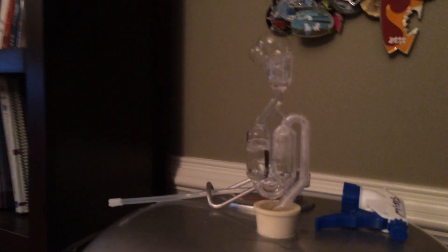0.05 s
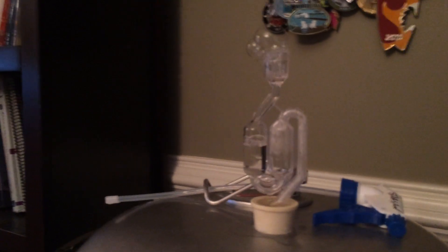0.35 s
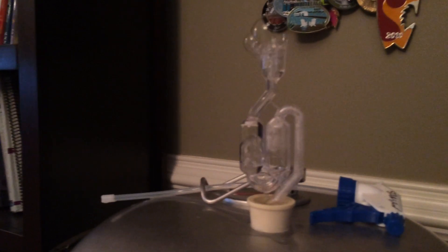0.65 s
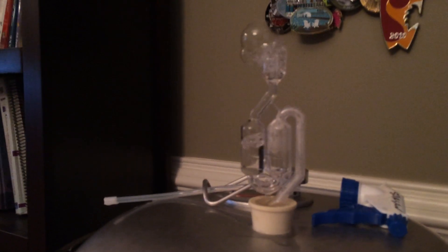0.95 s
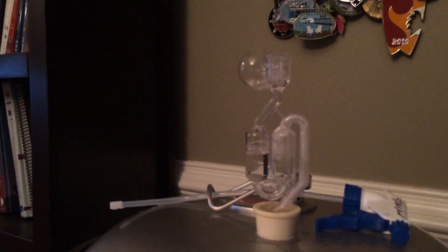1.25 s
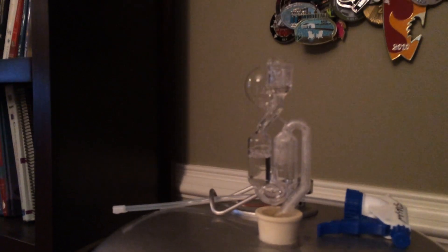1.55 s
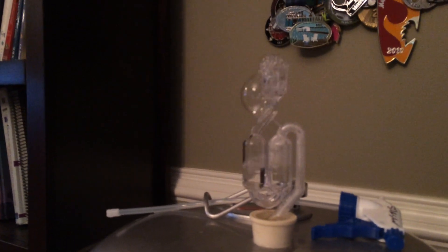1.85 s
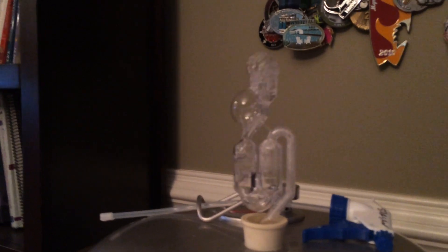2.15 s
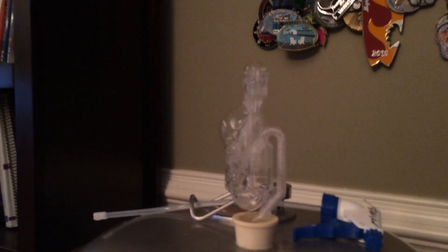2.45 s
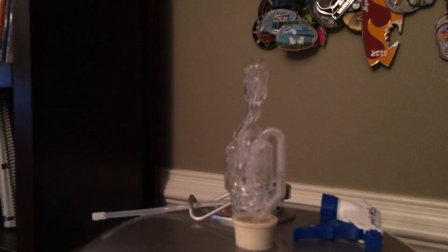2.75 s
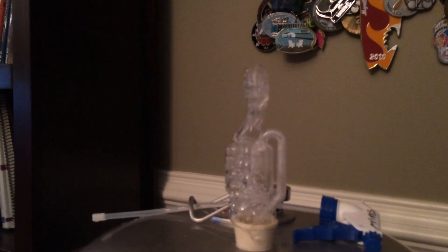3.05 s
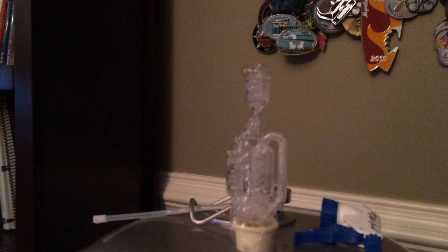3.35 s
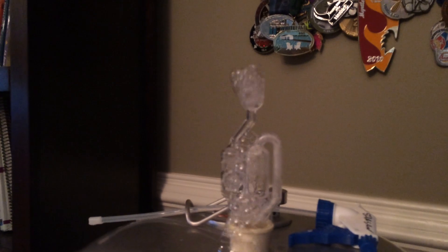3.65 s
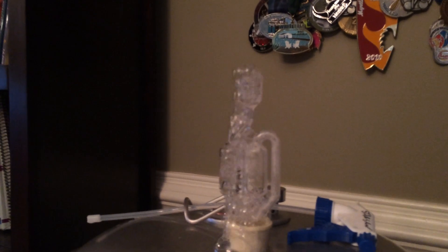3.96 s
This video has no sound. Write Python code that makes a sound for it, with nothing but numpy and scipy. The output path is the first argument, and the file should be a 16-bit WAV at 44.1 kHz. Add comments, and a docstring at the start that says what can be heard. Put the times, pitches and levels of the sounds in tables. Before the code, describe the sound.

Gas bubbles through the liquid in a plastic airlock, first as two separate plops, then as quick, churning gurgles. A few close, dry clicks come before the plops, and a soft hiss fills the small room throughout.

```python
"""An airlock bubbles in a small quiet room: gas pushes through the liquid in two single plops, then a
run of gurgles. Each bubble rings with a gliding pitch, mostly upward; bursting films ring the chamber
and throw a fine spray, while the liquid churns and gas squirts through closing pockets.
Near the start a few dry handling clicks sound close by. A steady hiss lies under it all."""
import sys
import numpy as np
from scipy import signal
from scipy.fft import rfft, irfft
from scipy.io import wavfile
from scipy.ndimage import map_coordinates

SR = 44100
rng = np.random.default_rng(int(sys.argv[2]) if len(sys.argv) > 2 else 0)


def wrap_up_sound(samples):
    """Save the sound to the file named by the first command line argument, as 16-bit audio."""
    columns = np.atleast_2d(samples).T
    # keep every value between -1 and 1, then stretch to whole-number steps
    tamed = np.clip(columns, -1, 1)
    steps = np.round(tamed * 32767).astype(np.int16)
    wavfile.write(sys.argv[1], SR, steps)


N = 176400


def gurgles():
    """Gas passes through the liquid bubble by bubble; the small, high ones hold their pitch better."""
    # Each row: start in seconds, pitch in Hz, level in dB, decay time in seconds,
    # opening glide in octaves per second.
    bubbles = [(0.0, 597, -41, 0.013, 2.5), (0.147, 1110, -59, 0.017, -2.5),
               (.722, 523.4, -24.5, 0.011, -0.5), (.723, 700, -36.5, 0.0064, 6),
               (.725, 1126, -29, 0.0051, 8.5), (.759, 12200, -46, 0.00063, 3), (0.772, 430, -28, 0.0012, 8),
               (.830, 784, -50, 0.013, 11), (.866, 606, -36.5, 0.0021, 0), (1.135, 905, -52, 0.016, 0.5),
               (1.823, 471, -25.5, 0.0081, -9), (1.824, 867, -26, 0.0031, 0),
               (1.824, 1120, -31.5, 0.0024, 10), (1.933, 864, -41, 0.009, 4.5),
               (1.984, 523, -35.5, 0.015, 2.5), (2.005, 1425, -50, 0.0094, -5.5),
               (2.068, 515, -37, 0.018, 3), (2.159, 540, -26.5, 0.0016, 16), (2.186, 782, -34.5, 0.013, 13),
               (2.205, 336, -45, 0.0024, 3), (2.207, 1460, -36, 0.0061, 3.5),
               (2.236, 847, -37.5, 0.011, -10), (2.302, 501, -31, 0.011, 6.5), (2.344, 435, -40, 0.007, -7),
               (2.347, 823, -37, 0.0079, 6), (2.382, 837, -31.5, 0.0075, 2), (2.384, 639, -38, 0.0096, 1.5),
               (2.382, 1840, -40, 0.0054, 2), (2.426, 513, -36, 0.0058, 8), (2.456, 471, -36.5, 0.014, 6.5),
               (2.488, 903, -30, 0.0056, 2), (2.504, 797, -38, 0.016, -0.5), (2.524, 688, -29.5, 0.0058, 1),
               (2.525, 1360, -39.5, 0.013, 7), (2.549, 488, -36, 0.013, 5.5), (2.59, 382, -53, 0.0073, 11),
               (2.652, 510, -42, 0.01, -1.5), (2.679, 567, -39.5, 0.0052, -5),
               (2.749, 826, -43, 0.013, -2.5), (2.774, 392, -41.5, 0.0092, 1.5),
               (2.823, 529, -33.5, 0.0086, 0), (2.857, 510, -29.5, 0.012, 4.5),
               (2.882, 844, -35, 0.012, 4.5), (2.883, 2697, -32.5, 0.0031, -5),
               (2.886, 3080, -37, 0.0028, 12), (2.910, 523, -34, 0.011, 4.5), (2.943, 856, -38.5, 0.016, 6),
               (2.943, 1090, -38, 0.0066, 8), (2.944, 1560, -46, 0.0067, 16), (2.959, 470, -36, 0.0046, 16),
               (2.992, 810, -41.5, 0.018, 1.5), (3.016, 512, -41.5, 0.0068, 13),
               (3.055, 523, -38, 0.024, 2), (3.111, 730, -34.5, 0.0044, 14.5), (3.154, 795, -43, 0.0064, 6),
               (3.217, 508, -35.5, 0.015, 1.5), (3.305, 442, -38, 0.012, -2.5),
               (3.305, 1045, -46, 0.019, 7.5), (3.406, 387, -39, 0.013, 0.5), (3.447, 916, -48.5, 0.012, 3),
               (3.502, 500, -36.5, 0.015, 12), (3.581, 516, -36, 0.005, 5.5),
               (3.607, 864, -40.5, 0.0072, 6), (3.662, 776, -42.5, 0.014, 19), (3.757, 546, -42, 0.015, 6),
               (3.762, 839, -49, 0.018, 9.5), (3.859, 464, -28.5, 0.011, 18),
               (3.899, 2795, -37.5, 0.0042, 1.5), (3.963, 541, -48.5, 0.013, 13)]
    swell_cycles, small_above_hz = 0.24, 585
    out = np.zeros(N)
    for start, hz, db, ring_s, glide in bubbles:
        wobble = 0.045 * min(small_above_hz / hz, 1)
        add(out, start, amp(db) * bubble(hz, ring_s, glide, swell_cycles / hz, wobble, flutter=0.18))
    return radiate(out)


def bubble(hz, ring_s, glide, swell_s, wobble=0, flutter=0):
    """A pocket of gas rings and dies away; its trembling shape wobbles the pitch and flutters the level."""
    glide_s, scoop_octaves, scoop_s, overtone_db = 0.0462, 0.043, 0.0031, -20.5
    t = np.arange(0, 8 * ring_s, 1 / SR)
    octaves = glide * glide_s * np.tanh(t / glide_s)  # the glide stops at the surface
    octaves -= scoop_octaves * np.exp(-t / scoop_s)  # starts flat while the neck pinches off
    pitch = hz * 2 ** octaves * (1 + wobble * drift(len(t), hz=68))
    phase = 2 * np.pi * np.cumsum(pitch) / SR
    level = (1 - np.exp(-t / swell_s)) * np.exp(-t / ring_s)
    level *= 1 + flutter * np.tanh(t / ring_s) * drift(len(t), hz=107)
    return level * (np.sin(phase) + amp(overtone_db) * level * np.sin(2 * phase))


def radiate(x, cutoff_hz=232):
    """A small vessel gives off little bass."""
    return signal.sosfilt(signal.butter(2, cutoff_hz, "high", fs=SR, output="sos"), x)


def bursts():
    """A tearing film is a short crackle that rings the chamber and throws spray."""
    # Each row: start in seconds, chamber ring in dB, spray in dB, crackle decay time in seconds.
    films = [(0.726, -32, -55.5, 0.0051), (0.769, -43, -73, 0.0017), (0.809, -63, -55, 0.0026),
             (1.825, -29.5, -48, 0.0016), (1.828, -58, -57.5, 0.0094), (2.161, -51, -82, 0.0027),
             (2.185, -41, -52.5, 0.0063), (2.213, -60, -70, 0.027), (2.235, -46, -61, 0.0085),
             (2.323, -37.5, -59, 0.0091), (2.326, -58, -56, 0.0016), (2.346, -51.5, -54.5, 0.01),
             (2.358, -52, -53, 0.0017), (2.392, -71, -56, 0.0024), (2.459, -53, -65, 0.007),
             (2.488, -38.5, -61.5, 0.0033), (2.524, -66, -51, 0.0032), (2.584, -38, -51, 0.0016),
             (2.61, -60, -55.5, 0.0058), (2.649, -59.5, -69, 0.032), (2.744, -36, -55.5, 0.0068),
             (2.757, -37, -71, 0.0016), (2.849, -45.5, -63.5, 0.013), (2.887, -41.5, -58, 0.0056),
             (2.987, -59, -63.5, 0.017), (3.099, -46, -61, 0.0087), (3.112, -36.5, -56, 0.0018),
             (3.222, -44.5, -60, 0.002), (3.377, -41.5, -63.5, 0.0054), (3.443, -60, -61, 0.0053),
             (3.529, -52.5, -71, 0.0066), (3.553, -82, -47, 0.0012), (3.607, -33.5, -57.5, 0.0041),
             (3.824, -50, -69, 0.0051), (3.877, -48, -66, 0.0096), (3.889, -47.5, -55.5, 0.0052)]
    # The chamber's resonances. Each row: pitch in Hz, relative level in dB, seconds to fall 60 dB.
    modes = [(832, 5, 0.029), (1195, -2.5, 0.018), (1510, -7.5, 0.013), (2056, 1, 0.012), (2348, 0, 0.033),
             (2647, -2.5, 0.014), (2845, -4.5, 0.017), (3198, -1, 0.0058)]
    cracks_per_s, tear_s = 3500, 0.0003
    t = np.arange(SR // 8) / SR
    strikes, spray = np.zeros((2, N))
    for start, ring_db, spray_db, decay_s in films:
        cracks = rng.random(len(t)) < cracks_per_s / SR
        fade = (1 - np.exp(-t / tear_s)) * np.exp(-t / decay_s)
        crackle = cracks * rng.choice([-1, 1], len(t)) * fade
        crackle *= np.linalg.norm(fade) / (np.linalg.norm(crackle) + 1e-20)
        add(strikes, start, amp(ring_db) * crackle)
        add(spray, start, amp(spray_db) * signal.fftconvolve(crackle, droplets(t[:SR // 50])))
    chamber = sum(amp(db - 60 * t / t60) * np.sin(2 * np.pi * hz * t) * (-1) ** k
                  for k, (hz, db, t60) in enumerate(modes))
    return signal.oaconvolve(strikes, chamber / np.linalg.norm(chamber))[:N] + spray


def droplets(t, count=40):
    """Spray is a scatter of tiny high pings, each with its own pitch, strength and delay."""
    # The tone of the spray. Each row: frequency in Hz, relative level in dB.
    tone = [(3000, 2.5), (4200, 1.5), (6000, -1), (8000, -1), (10500, -4.5), (12000, 0.5), (15500, -16)]
    ring_cycles, spread_db, mean_delay_s = 4.9, 3.5, 0.0027
    low_hz, high_hz = tone[0][0], tone[-1][0]
    hz = low_hz + (high_hz - low_hz) * (np.arange(count) + rng.random(count)) / count
    strength = amp(read(tone, hz) + spread_db * rng.standard_normal(count))
    age = np.maximum(t[:, None] - mean_delay_s * rng.exponential(1, count), 0)
    pings = (np.sin(2 * np.pi * hz * age) * np.exp(-age * hz / ring_cycles)) @ strength
    return pings / np.linalg.norm(pings)


def churn(sizes=48):
    """Bubbles of many sizes ring at random while the liquid is stirred up."""
    # The surges of the liquid. Each row: time in seconds, level in dB.
    surges = [(2.148, -65), (2.194, -43.5), (2.25, -64), (2.28, -73), (2.338, -49), (2.41, -61.5),
              (2.53, -51), (2.63, -60), (2.73, -61), (2.87, -52.5), (2.97, -53.5), (3.28, -67.5),
              (3.63, -56.5), (3.80, -66.5)]
    # The balance of bubble sizes. Each row: pitch in Hz, relative level in dB.
    tone = [(160, -8), (300, -6.5), (500, -6), (850, -4), (1300, -10), (3500, -12), (6000, -24)]
    bubbles_per_s, ring_cycles, spread_db = 800, 4.6, 4
    out = np.zeros(N)
    for hz in np.geomspace(tone[0][0], tone[-1][0], sizes):
        births = (rng.random(N) < bubbles_per_s / sizes / SR) * rng.choice([-1, 1], N)
        strength = amp(spread_db * np.minimum(rng.exponential(1, N), 3))
        ring = bubble(hz, ring_s=min(ring_cycles / hz, 0.012), glide=4.9, swell_s=0.5 / hz)
        out += amp(read(tone, hz)) * signal.oaconvolve(births * strength, ring)[:N]
    level_db = np.interp(np.arange(N) / SR, *np.transpose(surges), left=-120)
    return unit(radiate(out)) * amp(level_db)


def squirts(width_hz=350):
    """Rushing gas rings a shrinking pocket, so a rough whistle slides upward."""
    # Each row: start in seconds, length in seconds, first pitch in Hz, last pitch in Hz, level in dB.
    whistles = [(2.196, 0.058, 1190, 2850, -53.5), (2.335, 0.11, 1348, 2190, -63.5),
                (2.846, 0.0174, 1746, 2240, -54.5)]
    pole = np.exp(-np.pi * width_hz / SR)
    out = np.zeros(N)
    for start, length_s, first_hz, last_hz, db in whistles:
        count = round(length_s * SR)
        noise = rng.standard_normal((SR // 4, 2)) @ [1, 1j]
        rush = signal.lfilter([1], np.poly([pole, pole]), noise)[:count]
        sweep = np.exp(2j * np.pi * np.cumsum(np.linspace(first_hz, last_hz, count)) / SR)
        add(out, start, amp(db) * unit((rush * sweep).real * signal.windows.tukey(count)))
    return out


def handling():
    """Dry ticks, soft bumps and one short rub of a finger, all very close."""
    # Each row: start in seconds, tick level in dB, bump level in dB.
    clicks = [(0.2226, -28, -57), (0.229, -44, -44.5), (0.2584, -43.5, -67), (0.3756, -30, -79),
              (0.4228, -39.5, -51.5)]
    # The tones of the bright tick and the duller rub. Each row: frequency in Hz, relative level in dB.
    tick_tone = [(500, -85), (2200, -12.5), (4200, 3.5), (6500, 3), (10000, -7), (15500, -24)]
    rub_tone = [(300, 2), (1000, 4), (2500, 4), (4000, -5), (8000, -9), (13000, -21)]
    bump_s, rub_start, rub_s, rub_db = 0.00037, 0.312, 0.034, -63.5
    ticks, bumps, rub_level = np.zeros((3, N))
    age = np.arange(SR // 50) / SR / bump_s
    bump = age * (2 - age) * np.exp(1 - age)  # one push and a softer rebound
    for start, tick_db, bump_db in clicks:
        add(ticks, start, amp([tick_db]))
        add(bumps, start, amp(bump_db) * bump)
    add(rub_level, rub_start, amp(rub_db) * signal.windows.tukey(round(rub_s * SR)))
    return colour(ticks, tick_tone) + bumps + colour(rub_level * rng.standard_normal(N), rub_tone)


def room(x):
    """The small room adds a short diffuse tail, low resonances and near reflections."""
    # The diffuse tail. Each row: frequency in Hz, level in dB, seconds to fall 60 dB.
    tail = [(121, 11.5, 0.051), (215, 1, 0.087), (466, -20, 0.88), (960, -7.5, 0.47), (2870, -12, 0.48),
            (6470, -6, 0.76), (13900, -7, 0.24)]
    # The boom of the vessel and its corner. Each row: pitch in Hz, gain in dB, seconds to fall 60 dB.
    booms = [(203.3, -3, 0.16), (364.9, 9.5, 0.15), (542.3, -7, 0.25)]
    # Reflections off the table and the wall. Each row: delay in seconds, gain.
    echoes = [(.0055, 0.21), (0.0107, 0.22)]
    t = np.arange(SR // 2) / SR
    hz, age, bands = signal.stft(rng.standard_normal(len(t)), SR, nperseg=256)
    tail_db = read(np.array(tail)[:, :2], hz)[:, None]
    tail_t60 = read(np.array(tail)[:, ::2], hz)[:, None]
    bands *= amp(tail_db - 60 * age / tail_t60) * np.sqrt(2 * np.log(1000) / (tail_t60 * SR))
    fade_in = np.minimum(t / 0.0033, 1)
    response = signal.istft(bands, SR, nperseg=256)[1][:len(t)] * fade_in
    for boom_hz, db, t60 in booms:
        ring = amp(db - 60 * t / t60) * np.cos(2 * np.pi * boom_hz * t)
        response += ring * 2 * np.log(1000) / (t60 * SR)  # same gain however long it rings
    for delay, gain in echoes:
        add(response, delay, np.array([gain]))
    return x + signal.oaconvolve(x, response)[:N]


def background(hiss_db=-67.5):
    """Steady hiss and room rumble with a faint hum."""
    # The tone of the rumble and hiss. Each row: frequency in Hz, relative level in dB.
    tone = [(20, -41), (42, -9), (119, -5.5), (259, -12.5), (289, -18), (372, -12), (404, -13),
            (746, -24.5), (932, -22.5), (1070, -27.5), (1200, -25), (2270, -29.5), (3170, -31),
            (15500, -38)]
    # Each row: pitch in Hz, level in dB.
    hum_tones = [(119, -75.5), (920, -80)]
    t = np.arange(N) / SR
    gain = amp(read(tone, np.fft.rfftfreq(N, 1 / SR)))
    hiss = irfft(rfft(rng.standard_normal(N)) * gain, N)
    hum = sum(amp(db) * np.sin(2 * np.pi * (hz * t + rng.random())) for hz, db in hum_tones)
    return amp(hiss_db) * unit(hiss) + hum


def amp(db):
    """Decibels to gain."""
    return 10 ** (np.asarray(db) / 20)


def unit(x):
    """Scales to an rms of one."""
    return x / np.sqrt(np.mean(x ** 2) + 1e-20)


def read(points, hz):
    """Reads a curve on a log-frequency axis."""
    point_hz, value = np.transpose(points)
    return np.interp(np.log(hz + 1), np.log(point_hz + 1), value)


def add(mix, start, sound):
    """Mixes a sound in at a start time in seconds."""
    part = mix[max(round(start * SR), 0):][:len(sound)]
    part += sound[:len(part)]


def colour(x, tone, size=4096):
    """Gives a sound a tone through a causal filter of unit energy."""
    log_gain = np.log(amp(read(tone, abs(np.fft.fftfreq(size, 1 / SR)))))
    taps = np.fft.ifft(np.exp(np.conj(signal.hilbert(log_gain)))).real[:size // 2]
    return signal.oaconvolve(x, taps / np.linalg.norm(taps))[:len(x)]


def drift(count, hz):
    """Smooth random wandering of about unit size, at rates up to about hz."""
    knots = rng.standard_normal(200)
    return map_coordinates(knots, [np.arange(count) * 2 * hz / SR], order=3, mode="mirror")


def scene():
    """The airlock in its room, with dry handling noise and the background, in mono."""
    return (background() + room(gurgles() + bursts() + churn() + squirts()) + handling())[None]


def record(dry):
    """A steep low-pass trims the very top of the treble."""
    cutoff_hz = 15450
    lowpass = signal.firwin(511, cutoff_hz, window=("kaiser", 9), fs=SR)
    return signal.oaconvolve(dry, lowpass[None], "same")


dry = scene()
out = record(dry)
wrap_up_sound(out)
```